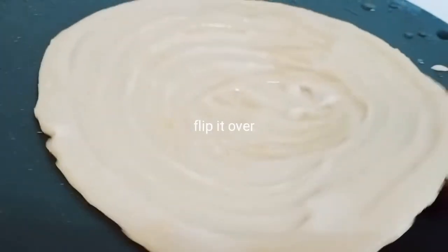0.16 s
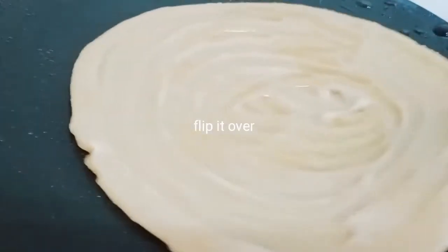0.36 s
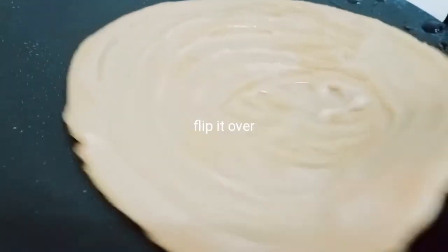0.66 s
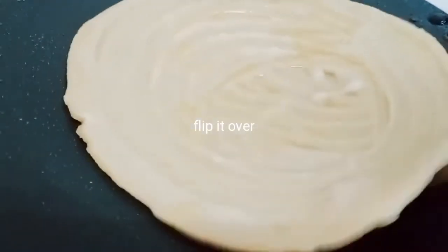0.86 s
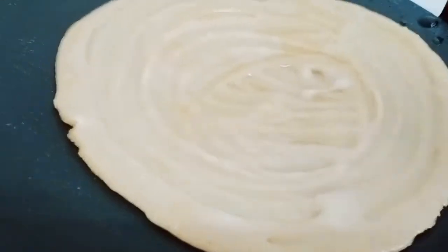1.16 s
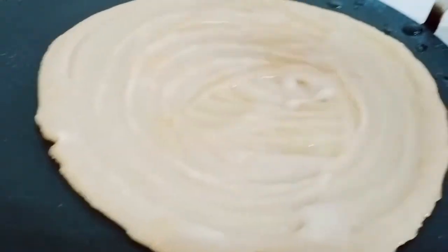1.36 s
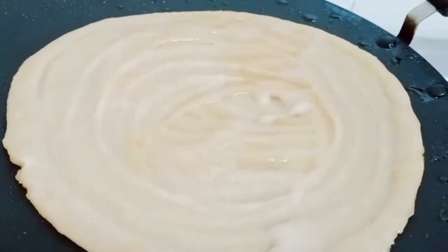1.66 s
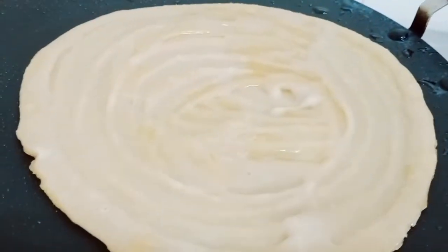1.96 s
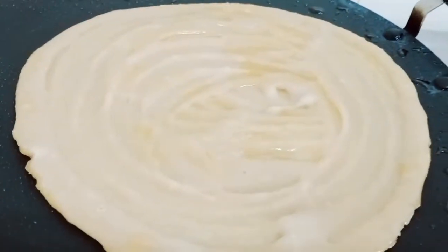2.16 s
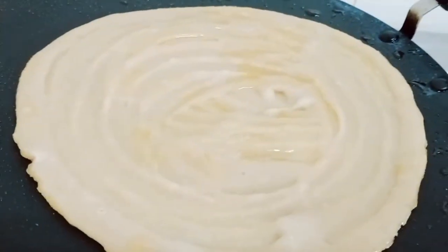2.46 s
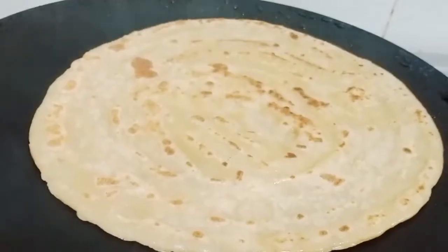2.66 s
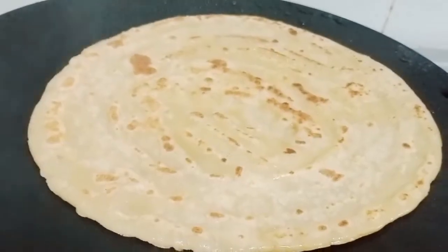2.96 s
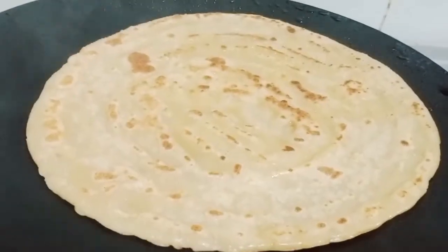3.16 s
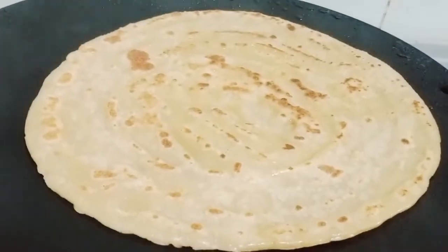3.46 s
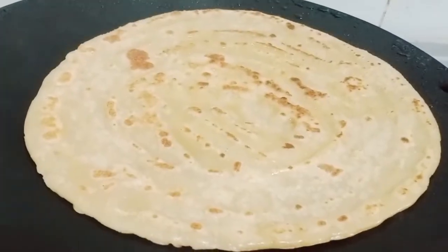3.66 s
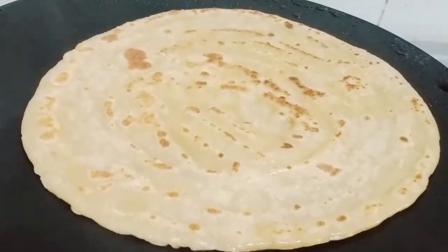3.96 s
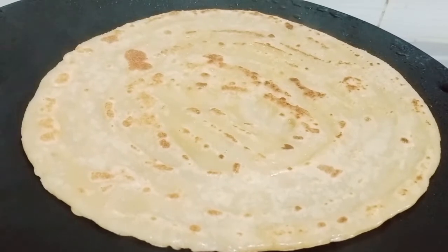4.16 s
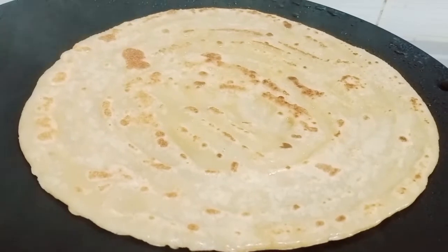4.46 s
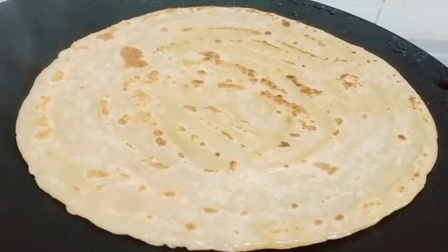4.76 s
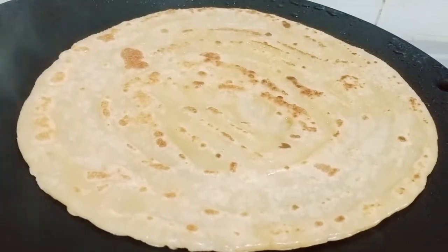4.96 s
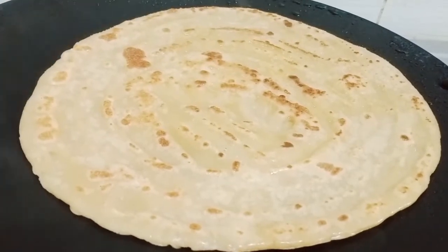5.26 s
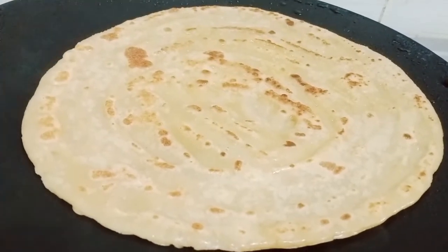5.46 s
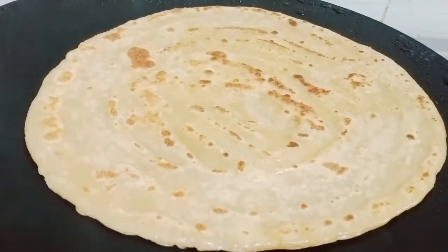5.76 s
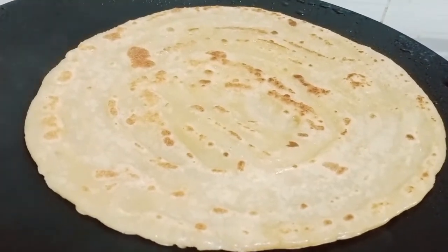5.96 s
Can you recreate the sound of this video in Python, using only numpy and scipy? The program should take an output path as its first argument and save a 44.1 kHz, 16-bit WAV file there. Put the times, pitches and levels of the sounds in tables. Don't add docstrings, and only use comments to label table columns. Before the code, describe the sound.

Busy frying crackle with metal spatula knocks thins out, giving way to a steady fine steam hiss and a high fluttering whistle.

```python
import sys
import numpy as np
from scipy import signal
from scipy.fft import rfft, irfft, next_fast_len
from scipy.io import wavfile
from scipy.ndimage import uniform_filter1d

SR = 44100
rng = np.random.default_rng(int(sys.argv[2]) if len(sys.argv) > 2 else 0)


def invert_db(x):
    u = np.asarray(x, float) / 20
    return 10 ** u


def store_pcm(level_fs):
    pcm = np.round(np.clip(level_fs, -1, 1) * 32767).astype(np.int16)
    wavfile.write(sys.argv[1], SR, np.atleast_2d(pcm).T)


N = 269847
TIME = np.arange(N) / SR

# (centre [Hz], width [Hz], level [dB])
BODY = [(2710, 550, 4.5), (3580, 1500, 15.5)]
# (centre [Hz], width [Hz], level [dB])
SPLASH = [(6000, 8800, 0.5)]
# (centre [Hz], width [Hz], level [dB])
RING = [(8740, 1380, 3.5), (7560, 2100, -8.5), (8850, 550, -30)]
# (centre [Hz], width [Hz], level [dB])
TOP = [(12100, 2560, -7), (14400, 2500, -4.5)]
# (centre [Hz], width [Hz], level [dB])
RUSH = [(764, 890, -1.5), (1710, 1250, -7)]


def level(x, db):
    return x * invert_db(db) / np.sqrt(np.mean(x ** 2))


def soft_gate(is_on):
    return uniform_filter1d(1. * is_on, size=128)


def curves(table):
    s, *columns = np.transpose(table)
    gate = soft_gate((TIME >= s[0]) & (TIME <= s[-1]))
    return [np.interp(TIME, s, c) for c in columns], gate


def resonate(x, modes):
    out = 0
    for hz, width_hz, db in modes:
        b, a = signal.iirpeak(min(hz, 20000), hz / width_hz / 1.34, fs=SR)
        once = signal.lfilter(b, a, x)
        out = out + invert_db(db) * signal.lfilter(b, a, once)
    return out


def ring(x, modes):
    out = 0
    for hz, db, t60_s in modes:
        pole = np.exp(2j * np.pi * hz / SR - np.log(1000) / (t60_s * SR))
        out = out + invert_db(db) * signal.lfilter([1], [1, -pole], x).imag
    return out


def coloured(points):
    n = next_fast_len(N)
    hz, db = np.transpose(points)
    bin_hz = np.arange(n // 2 + 1) * SR / n
    gain = invert_db(np.interp(np.log(bin_hz + 1), np.log(hz), db))
    return level(irfft(rfft(rng.standard_normal(n)) * gain, n)[:N], 0)


def walk(rate):
    k = int(SR / rate)
    held = np.repeat(rng.standard_normal(N // k + 1), k)
    return 1.306 * uniform_filter1d(uniform_filter1d(held, k), k)[:N]


def bubbles(rate, spread_db, most_db):
    chance = rng.random((2, N))
    size_db = np.minimum(-spread_db * np.log(1 - chance[1]), most_db)
    return (chance[0] < rate / SR) * invert_db(2 * size_db)


def puffs(power, length_ms, bed):
    tail = signal.lfilter([1], [1, -np.exp(-1000 / (length_ms * SR))], power)
    share = np.clip(bed, 0, 1)
    return np.sqrt(share + (1 - share) * tail / uniform_filter1d(tail, size=8000).clip(1e-9))


def kitchen():
    # (pitch [Hz], rms level [dB])
    motor = [(48.6, -72), (118.5, -73.5), (178, -66), (195.5, -62.5), (294.3, -63.5), (314, -60.5),
             (427, -73.5)]
    # (frequency [Hz], density [dB per Hz])
    rumble = [(25, -36), (40, -9), (50, -16), (70, -4.5), (120, 0), (180, -0.5), (240, -2), (330, -1.5),
              (450, -9), (1000, -11.5), (3000, -14), (5000, -17.5), (9000, -11.5), (16000, -34)]
    tones = 0
    for hz, db in motor:
        phase = 2 * np.pi * np.cumsum(hz * (1 + .0025 * walk(rate=9.))) / SR
        tones = tones + np.sqrt(2) * np.sin(phase) * invert_db(db + 1.1 * walk(rate=4.))
    return tones + coloured(rumble) * invert_db(-53.5)


def vent():
    # (time [s], pitch [Hz], level [dB])
    breaths = [
        [(3.01, 5750, -62), (3.07, 5700, -63), (3.115, 5250, -59), (3.27, 5330, -58), (3.33, 5470, -63),
         (3.37, 5270, -58), (3.44, 5510, -60), (3.52, 5680, -71)],
        [(3.52, 5750, -72), (3.59, 6040, -58), (3.71, 6000, -61), (3.75, 5950, -60), (3.96, 6350, -58),
         (4.07, 6000, -61), (4.21, 5750, -61), (4.36, 6150, -57), (4.44, 5150, -66)],
        [(4.47, 5350, -59), (4.55, 5300, -59), (4.73, 5620, -65), (4.78, 5430, -56), (4.86, 5630, -62),
         (5.1, 5510, -60.5), (5.21, 5820, -61), (5.31, 5790, -60), (5.36, 5290, -62)],
        [(5.365, 5550, -59), (5.5, 5580, -59), (5.66, 5270, -61), (5.75, 5400, -61), (5.9, 5550, -62),
         (5.95, 5770, -56), (6.04, 5960, -57), (6.07, 5500, -63), (6.12, 5800, -61)],
    ]
    # (time of reopening [s], time shut [s], pitch overshoot [Hz])
    clogs = [
        (3.14, .025, 350),
        (3.22, 0.031, 452),
        (3.285, .004, 250),
        (4.47, .02, 251),
        (4.57, 0.0046, 249),
        (5.365, .006, 904),
        (5.95, 0.044, 647),
        (6.085, .015, 450),
    ]
    # (time [s], wetness [0-1])
    wetness = [
        (3.0, .3),
        (4.0, .1),
        (4.15, 1),
        (4.5, 0.5),
        (5.9, 0.9),
        (5.96, 0.03),
    ]
    settle_s, glide_loss_db_per_khz = .018, -3
    sway, jitter = .015 * walk(rate=90.), .004 * walk(rate=500.)
    choke, turbulence = walk(rate=80.), walk(rate=300.)
    (hz, db), gate = curves([row for breath in breaths for row in breath])
    for s, shut_s, over_hz in clogs:
        over = over_hz * np.exp(-np.abs(TIME - s) / settle_s) * (TIME >= s)
        hz = hz + over
        db = db + glide_loss_db_per_khz * over / 1000
        gate = gate * (1 - soft_gate((TIME >= s - shut_s) & (TIME < s)))
    flutter = np.clip(np.interp(TIME, *np.transpose(wetness)), 0, 1)
    choke_db = (1.1 + .7 * flutter) * choke
    breathy = 1 + .45 * flutter * (turbulence - .5)
    phase = 2 * np.pi * np.cumsum(hz * (1 + flutter * sway + jitter)) / SR
    return np.sqrt(2) * np.sin(phase) * breathy * invert_db(db + choke_db) * gate


def steam():
    # (time [s], level [dB])
    hiss = [
        (3.0, -43),
        (3.25, -44),
        (6.12, -44),
    ]
    # (frequency [Hz], density [dB per Hz])
    hiss_colour = [(500, -20.5), (1130, -15.5), (2200, -8.5), (3420, -1.5), (4200, -11.5), (4880, -33),
                   (5600, -12.5), (6700, -17), (7600, -6), (8900, 3), (10000, -4), (11400, -10.5),
                   (13000, -5.5), (14800, -1.5), (16000, -10.5)]
    (db,), gate = curves(hiss)
    fizz = bubbles(rate=600., spread_db=3.0, most_db=9.)
    grain = puffs(fizz, length_ms=0.89, bed=0.77)
    return coloured(hiss_colour) * grain * invert_db(db - 0.24 + 0.51 * walk(rate=12.)) * gate


def spatula():
    # (time [s], peak [dB], blade click re plate [dB], blade pitch factor by grip [1])
    knocks = [
        (0.4977, -36.5, -0.5, 0.91),
        (0.6923, -25.5, 0, 0.91),
        (1.0911, -26, -1.5, 0.77),
        (1.2763, -28.5, 9.5, 1.0),
        (1.295, -42, 13, 1.2),
        (2.099, -39, -6, 1.2),
    ]
    # (pitch [Hz], level [dB], t60 [s])
    plate_modes = [(187.7, -11, 0.52), (333, -24, 0.3), (390, -14, 0.13), (654, -12, 0.75), (662, -12, 0.2),
                   (724, 4, 0.032), (350, 9.5, 0.017), (1246, -4.5, 0.056)]
    # (pitch [Hz], level [dB], t60 [s])
    blade_modes = [(2000, -8, 0.019), (2370, -3, 0.02), (2500, 2, 0.03), (2980, 6, 0.016),
                   (3560, -1, 0.016)]
    push, blade = np.zeros(N), np.zeros(N)
    age_s = np.arange(8000) / SR
    chatter = invert_db(-33.5) * np.exp(-age_s / 0.024) * rng.standard_normal(len(age_s))
    tick = chatter - (age_s == 0)
    for s, db, blade_db, grip in knocks:
        at = int(s * SR)
        push[at] = -invert_db(db)
        gripped = [(grip * hz, mode_db, t60_s) for hz, mode_db, t60_s in blade_modes]
        blade[at:at + len(age_s)] += invert_db(db + blade_db) * ring(tick, gripped)
    shudder = signal.lfilter([1], [1, -np.exp(-1 / (.09 * SR))], push) * rng.standard_normal(N)
    knock = invert_db(-9.5) * ring(push + invert_db(-35.5) * shudder, plate_modes) + invert_db(-7.0) * blade
    knock = knock + invert_db(2.5) * resonate(push, [(1670, 3600, 0)])
    return signal.sosfilt(signal.butter(2, 170., "high", fs=SR, output="sos"), knock)


def pops():
    # (time [s], ring
    # over 3 ms [dB], body re ring [dB], length [ms])
    spits = [(0.015, -28, -25, 0.075), (0.085, -29, -16, .05), (0.1393, -22, -25, .053),
             (0.2068, -27, -8, .06), (0.248, -21.5, -22, .08), (0.2732, -18, -23, 0.17),
             (0.2987, -17.5, -32, 0.27), (0.4496, -24.5, -25, .11), (0.568, -31, -7, .055),
             (0.581, -29, -13, .055), (0.6, -31, -9, 0.15), (0.616, -39, -7, .11), (0.731, -35, -12, .05),
             (0.8075, -35, 1, 0.55), (0.814, -37, -17, .18), (0.9109, -26, -11, .05),
             (0.9237, -45, -8, .05), (0.9395, -33, -11, .06), (0.952, -25, -17, 0.11),
             (1.018, -29, -7.5, .05), (1.0558, -33, -21, .08), (1.1317, -32, -12, .11),
             (1.141, -37.5, 1, .06), (1.2168, -27, -6.5, 0.2), (1.3028, -26, -1.5, 0.16),
             (1.3735, -29, -10, .06), (1.412, -29, -3, 0.077), (1.4358, -23, -1, 0.11),
             (1.461, -31, -3, 0.072),
             (1.6755, -27, -22, 0.18), (1.7141, -30, -8, .05), (1.7465, -29.5, -8, 0.29),
                (1.787, -35, -1, 0.11), (1.8035, -34.5, -7, .3), (1.8274, -32, -10, .3),
                (1.8741, -31, -14, 0.12), (1.8968, -24.5, -15, .1), (1.919, -22.5, -18, 0.52),
                (1.9603, -33, -16, .12), (2.011, -32.5, -20, .06), (2.049, -30, -24, .05),
                (2.062, -30.5, -11, 0.13), (2.0772, -32, -8, 0.41), (2.1126, -31, -7, 0.091),
                (2.1956, -38, -16, .16), (2.2041, -32, -12, 0.076), (2.2356, -39, -23, .12),
                (2.2624, -36, -19, .057), (2.2994, -31.5, -7, 0.48), (2.3895, -36.5, -8, 0.074),
                (2.4228, -33, -8.5, 0.084), (2.4762, -51, 9, .05), (2.5576, -43, -1.5, 0.059),
                (2.6198, -45, 5, 0.16), (2.744, -42, -5, 0.092), (2.8121, -42, -20, 0.67),
                (2.859, -38, -19, 0.2), (2.877, -32, -16, 0.27), (2.9637, -39, -7, .05),
             (2.317, -44, -2, .12), (2.4415, -44, -8, .06), (2.5213, -39, -12, .3), (2.905, -49, -4, .06),
             (2.9893, -46, -14, .3), (3.6888, -37, -18, 0.24), (4.212, -41, -12, .09),
             (4.324, -34.5, -7, 0.25), (4.3328, -34.5, -10, 0.29), (4.6484, -43, -20, .17),
             (5.0896, -40.5, -4, .13), (5.2985, -46, -8, .06)]
    # (time [s], ring over 3 ms [dB], body re ring [dB], length [ms])
    snaps = [(0.1988, -24.5, -11, .2), (0.7796, -25.5, -4, .06), (0.9171, -29, -16, 0.2),
             (1.3384, -25, -7, .05), (1.3474, -23, -15, .05), (1.358, -28, -15, 0.12),
             (1.3909, -21, -11, 0.055), (1.6946, -28, -12, .05), (2.008, -30, -17, 0.14),
             (2.3275, -30, -18, 0.16), (2.681, -20, -19.5, 0.029), (2.7995, -28, -15.5, 1)]
    snap_thud_db, pop_thud_db = -4.5, -26.5
    out = np.zeros(N + 512)
    age_ms = np.arange(512) / SR * 1000
    bursts = [(*row, snap_thud_db) for row in snaps]
    bursts += [(*row, pop_thud_db) for row in spits]
    for s, db, body_db, ms, thud_db in bursts:
        top_db = -9 - 0.53 * (db + 21)
        thud_db = thud_db + 0.51 * body_db
        ms = np.clip(ms, .03, 3)
        rush = 2 * ms * rng.standard_normal(512) * np.exp(-age_ms / (1.6 * ms)) * (age_ms > 0)
        shape = rush - (age_ms == 0)
        bands = [resonate(shape, modes) for modes in (RING, [*BODY, *SPLASH], TOP, RUSH)]
        gains = invert_db(db + np.array([0, body_db, top_db, thud_db])) * np.sqrt(.003 * SR)
        gains = gains * [1, -1, -1, 1]
        at = int(s * SR)
        out[at:at + 512] += sum(g * band / np.sqrt(np.sum(band ** 2)) for g, band in zip(gains, bands))
    lag_s = np.arange(1200) / SR
    echo = rng.standard_normal(1200) * np.exp(-lag_s / 0.006) * (lag_s > .0006)
    return invert_db(-2.9) * (out + invert_db(-31.5) * signal.fftconvolve(out, echo)[:len(out)])[:N]


def frying():
    # (time [s], level [dB], extra weight of large drops [dB])
    fry = [
        (0, -37, 5.5),
        (.5, -39.5, 4),
        (1.1, -40.5, 4),
        (1.5, -43, -5.5),
        (1.72, -39.5, 2.5),
        (1.9, -40.5, -4),
        (2.15, -44, -2.5),
        (2.6, -50.5, -20),
        (3.0, -55, -17),
    ]
    # (time [s], hold [s], rise [dB])
    surges = [(.06, 0.045, 4), (.18, .23, 5), (.26, 0.013, 4.5), (0.544, 0.05, 8), (.755, 0.0016, 9.5),
              (0.892, 0.089, 6.5), (1.12, 0.076, 5), (1.19, 0, 4.5), (1.26, 0, 12.5), (1.33, 0.091, 8.5),
              (1.505, 0.055, 7.5), (1.6, .07, 5.5), (1.73, 0, 3.5), (2.0, 0.065, 1), (2.18, 0, 2),
              (2.31, 0, 1), (2.67, 0.021, 5.5), (2.785, 0, 10), (2.86, 0.023, 3), (2.93, 0, 5)]
    rise_s, fall_s = .03, 0.064
    (ring_db, big_db), gate = curves(fry)
    for s, hold_s, rise_db in surges:
        top_s = s + rise_s
        end_s = top_s + abs(hold_s)
        ring_db = ring_db + np.interp(TIME, [s, top_s, end_s, end_s + fall_s], [0, rise_db, rise_db, 0])
    boil_db = ring_db + 40
    body_db = -8.5 - 0.2 * boil_db + 0.1 * big_db
    top_db = -6 - 0.4 * boil_db
    rush_db = -14 - 0.96 * boil_db + 0.34 * big_db
    froth_db = -13.5 - 0.53 * boil_db + big_db
    splash_db = -22.9 + .8 * boil_db + .6 * big_db
    shared = bubbles(rate=900., spread_db=4.0, most_db=11.)
    spurt_db = .8 * walk(rate=45.)
    # (resonances, level [dB], bed share [0-1], own spread [dB])
    bands = ((RING, -0.3, .3, 2.5), (BODY, body_db, .45, 3.0), (TOP, top_db, .35, 2.5),
             (SPLASH, splash_db, .35, 3.0), (RUSH[:1], rush_db, .7, 2.5), (RUSH[1:], froth_db, .6, 2.5))
    out = 0
    for modes, db, bed, own_db in bands:
        power = shared * invert_db(2 * np.clip(own_db * rng.standard_normal(N), -9, 5))
        burst = puffs(power, length_ms=.35, bed=bed) * rng.standard_normal(N)
        out = out + level(resonate(burst, modes), 0) * invert_db(db + 0.16 * walk(rate=15.3))
    return out * invert_db(ring_db + spurt_db) * gate


def scene():
    mono = kitchen() + vent() + steam() + spatula() + pops() + frying()
    return np.array([mono, mono])


def low_pass(x):
    return signal.sosfilt(signal.butter(12, 16810, fs=SR, output="sos"), x)


def record(dry):
    cut = signal.sosfiltfilt(signal.ellip(8, .1, 30, 15460, fs=SR, output="sos"), dry)
    return low_pass(cut)


dry = scene()
out = record(dry)
store_pcm(out)
```